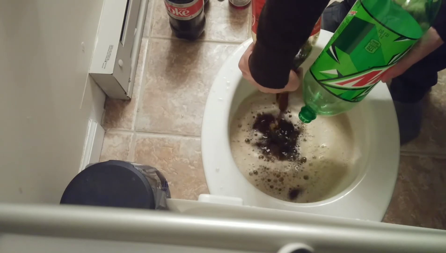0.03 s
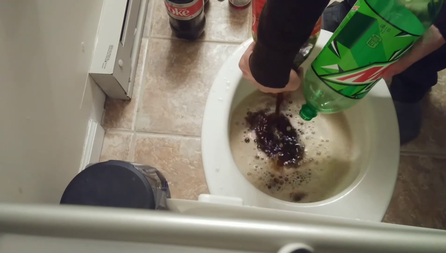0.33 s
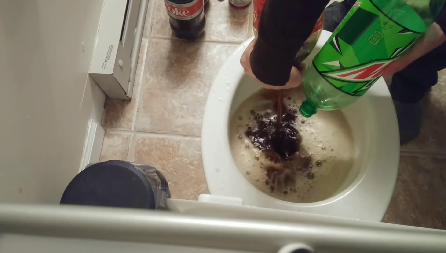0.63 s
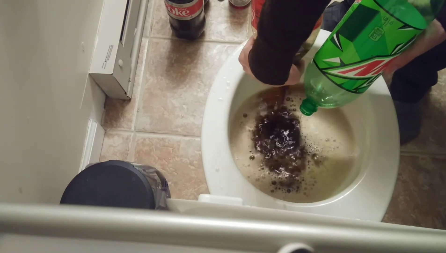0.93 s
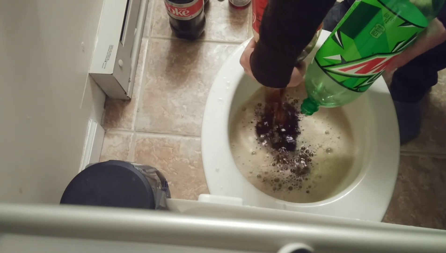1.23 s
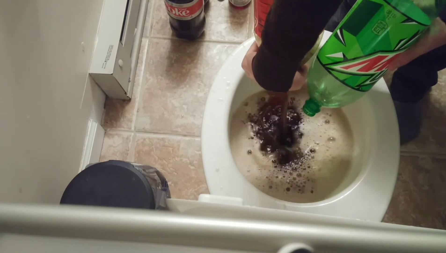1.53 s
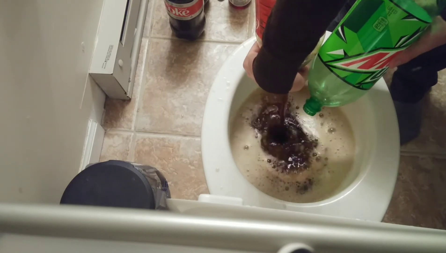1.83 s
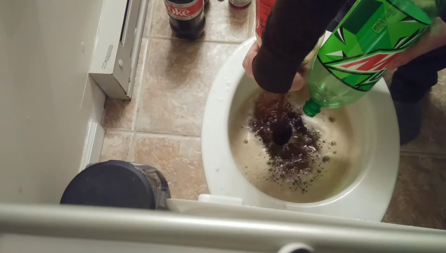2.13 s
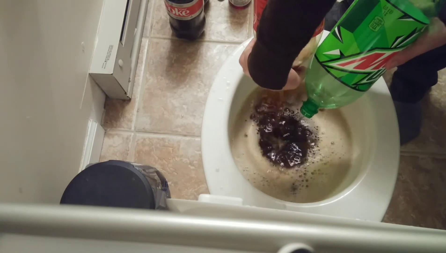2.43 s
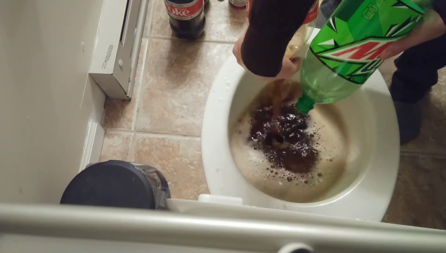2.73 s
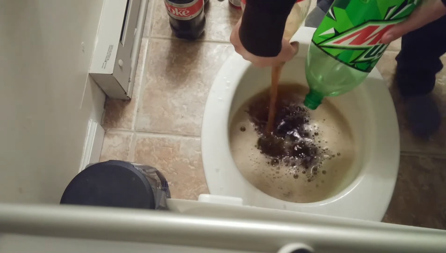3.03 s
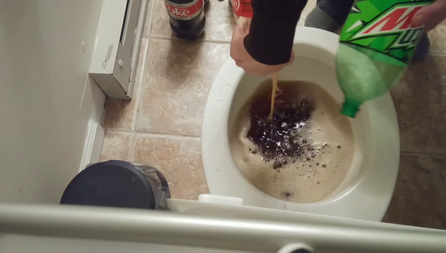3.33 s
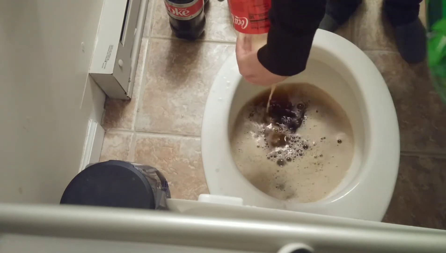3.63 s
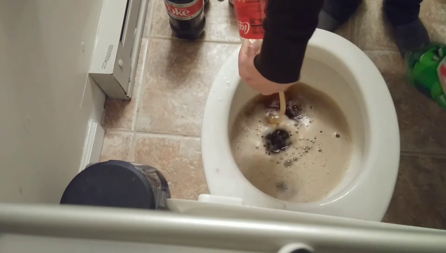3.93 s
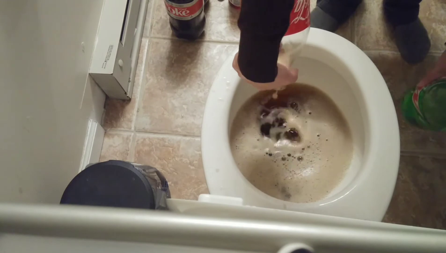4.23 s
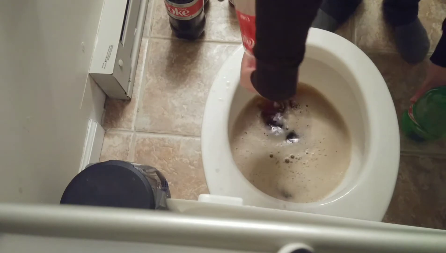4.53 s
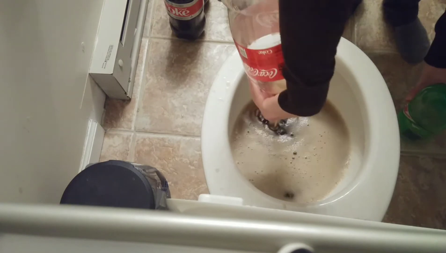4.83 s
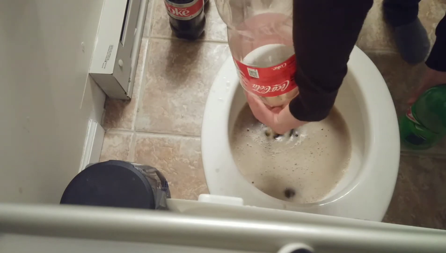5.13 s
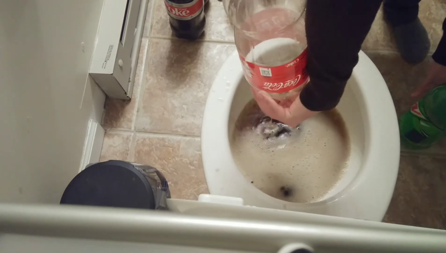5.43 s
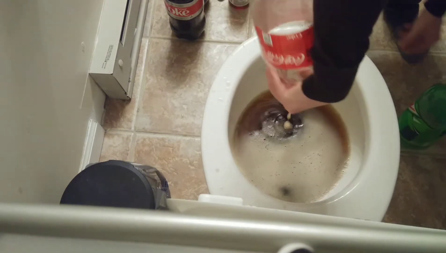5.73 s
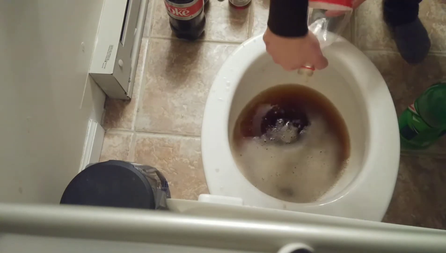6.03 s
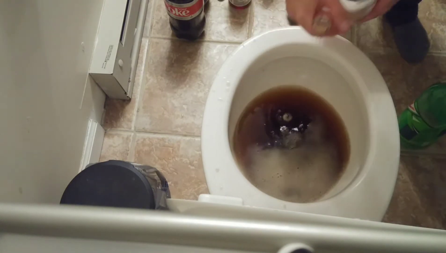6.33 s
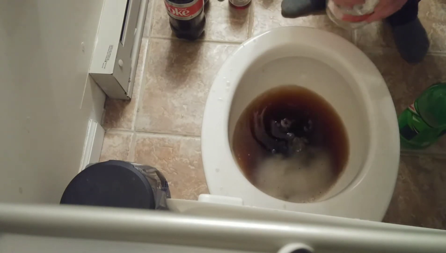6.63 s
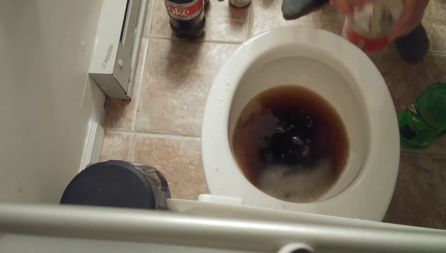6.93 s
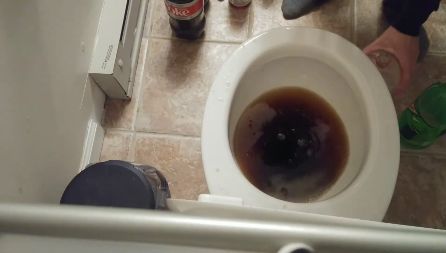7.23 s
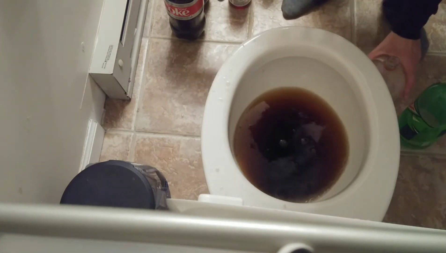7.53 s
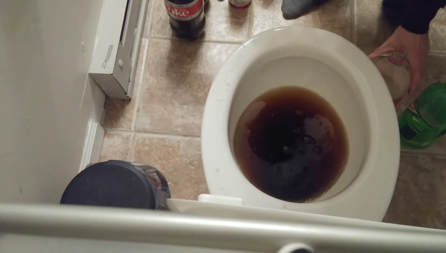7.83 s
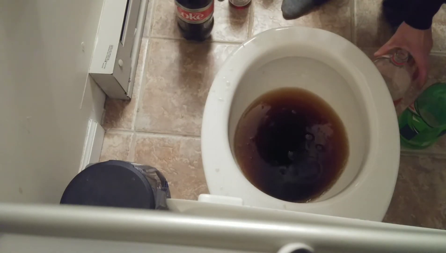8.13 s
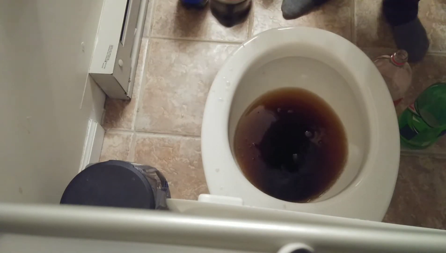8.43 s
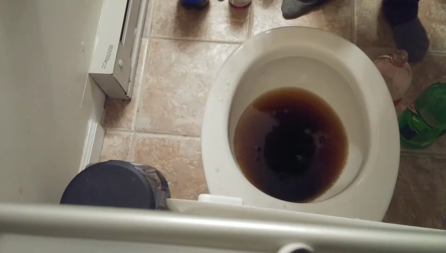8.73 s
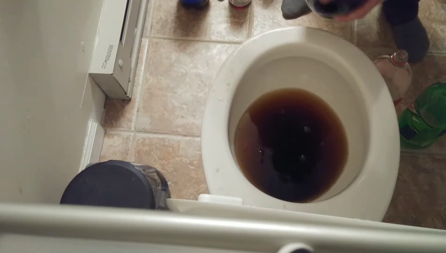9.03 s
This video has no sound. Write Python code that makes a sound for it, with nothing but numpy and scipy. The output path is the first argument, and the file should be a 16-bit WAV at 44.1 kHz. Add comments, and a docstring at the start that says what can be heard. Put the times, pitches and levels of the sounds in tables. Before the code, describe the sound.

Fizzy drink pours from big bottles into a toilet in rhythmic gulps, trickles off, and a hollow plastic bottle clatters down.

```python
"""Two big bottles of soda are emptied into a toilet bowl in a small tiled bathroom.
First the necks glug, about four gulps a second: soda slaps and sprays, trapped bubbles ring, foam fizzes.
By 3.5 s the streams thin to a trickle, and the last drops are shaken out over the hollow bowl.
At 7 s, as the foam collapses, an empty plastic bottle is knocked down and clatters on the floor.
Last, fingers rub and crinkle the thin plastic over a faint room tone."""
import sys
import numpy as np
from scipy import signal
from scipy.fft import rfft, irfft
from scipy.io import wavfile
from scipy.ndimage import uniform_filter1d

SR = 44100
rng = np.random.default_rng(int(sys.argv[2]) if len(sys.argv) > 2 else 0)


def wav_record(signal):
    """Record a signal, one row per channel, as 16-bit PCM in the file named by sys.argv[1]."""
    frames = np.transpose(np.atleast_2d(signal))
    bounded = np.clip(frames, -1, 1)
    # unit amplitude maps onto the largest positive 16-bit level
    quanta = np.round(bounded * 32767).astype(np.int16)
    wavfile.write(sys.argv[1], SR, quanta)


N = 405719
T = np.arange(SR // 2) / SR  # time within a one-shot, s

# gulps at the bottle necks: t/s, slap level/dB, slap centre f/Hz, gurgle level/dB, spray level/dB
GULPS = [(0.001, -27, 1100, -36, -41), (0.210, -37, 1890, -34, -39), (0.461, -29, 1274, -34.5, -73),
         (0.666, -35, 2010, -40, -37.5), (0.925, -47.5, 1420, -57, -40.5), (1.089, -40, 2030, -45, -72),
         (1.155, -39.5, 2100, -45.5, -45.5), (1.387, -36, 2170, -44, -48),
         (1.623, -33.5, 1820, -33.5, -30.5), (1.868, -39, 2090, -40, -42), (2.170, -35, 2270, -35.5, -45.5),
         (2.412, -29, 1950, -40, -38.5), (2.666, -50, 1650, -40.5, -42.5), (2.889, -46, 1610, -43, -36.5),
         (3.131, -38, 2230, -36.5, -36.5), (3.341, -33.5, 1076, -36.5, -44.5)]
# EQ of the wet slap: f/Hz, gain/dB
SLAP_EQ = [(50, 2), (110, 8), (170, -11), (300, -6), (700, 6.5), (1100, -13), (2200, 6), (3000, 4),
           (4300, 3), (8000, -32), (16000, -55)]


def glugs(room):
    """Each gulp of air slaps the liquid, traps mid-sized bubbles and leaves a gurgle of low ones."""
    out = np.zeros(N)
    for s, slap_db, hz, gurgle_db, _ in GULPS:
        splash = clicks(5000, 0.68, size=len(T)) * fade(0.033) * (1 - fade(0.01))
        slap = filt(eq(splash, SLAP_EQ), [hz / 1.93, hz * 1.09], "band", order=1)
        trapped = cluster(hz, spread=2.47, seconds=0.019, cycles=43, count=9)
        add(out, s, loudest(echo(unit(slap) + trapped, room), slap_db))
        gurgle = filt(cluster(330, spread=1.76, seconds=0.03, cycles=20.5, count=5), 280, "high")
        add(out, s, loudest(echo(gurgle, room), gurgle_db))
    return out


# the featured single bubbles: t/s, f/Hz, level/dB
BIG_BUBBLES = [(0.003, 276, -30), (0.372, 433, -42), (0.467, 272, -32.5), (0.553, 410, -40),
               (0.601, 3440, -36), (0.758, 1370, -39), (0.795, 430, -29.5), (0.833, 466, -37),
               (0.895, 2500, -37), (0.932, 372, -32.5), (1.177, 408, -39), (1.420, 422, -42.5),
               (1.622, 4390, -30.5), (1.688, 456, -34.5), (1.722, 654, -33.5), (1.775, 410, -37),
               (1.799, 847, -30.5), (1.965, 366, -39), (2.010, 720, -42), (2.075, 585, -42),
               (2.252, 338, -36), (2.483, 414, -42.5), (2.527, 630, -38), (2.743, 383, -37.5),
               (2.868, 1600, -41.5), (2.9, 365, -36.5), (3.352, 610, -37.5), (3.402, 292, -35)]


def plops(room):
    """Air pockets dragged under ring at their own notes; smaller, higher ones last more cycles."""
    out = np.zeros(N)
    featured = [(s, hz, db, 19.6 * (hz / 404) ** 0.43) for s, hz, db in BIG_BUBBLES]
    bloops = strays(low_hz=324, high_hz=728, boost_db=10.5, cycles=33, count=2)
    pings = strays(low_hz=1503, high_hz=5330, boost_db=9.3, cycles=52, count=4)
    for s, hz, db, cycles in featured + bloops + pings:
        ring = np.zeros(len(T))
        add(ring, 0, bubble(hz, cycles, glide=0.053, swell=1.66))
        add(out, s, loudest(echo(ring, room), db))
    return out


def strays(low_hz, high_hz, boost_db, cycles, count):
    """Cues for chance bubbles behind each gulp: t/s, f/Hz, level/dB, cycles."""
    return [(s, low_hz * (high_hz / low_hz) ** rng.random(), db + boost_db, cycles)
            for s, db in wake(count)]


def wake(count, first_s=0.027, last_s=0.15, scatter_db=3):
    """Random cues just after each gulp, louder while the streams run harder: t/s, level/dB."""
    cues = []
    for s, *_ in GULPS:
        for late, size in rng.random((count, 2)):
            born = s + first_s + late * (last_s - first_s)
            flow_db = np.interp(born, *np.transpose(FLOW))
            cues.append((born, flow_db + scatter_db * (2 * size - 1)))
    return cues


# splashes between the gulps: t/s, patter level/dB, tick level/dB
SPLASHES = [(0.2618, -41, -63), (0.489, -41.5, -52), (0.601, -42, -62), (0.6893, -33, -62),
            (0.7132, -43.5, -49), (0.7876, -35.5, -47), (1.0307, -58, -44), (1.197, -42.5, -68),
            (1.2954, -43, -42.5), (1.3463, -36.5, -68), (1.364, -44, -43), (2.0604, -40, -68),
            (2.3118, -44, -57), (2.494, -39.5, -69), (2.5284, -44, -70), (2.7916, -38, -54),
            (3.0382, -40.5, -46)]
# EQ of drops hitting water: f/Hz, gain/dB
SPRAY_EQ = [(200, -27), (700, -17), (2000, -13), (3700, 2.5), (5000, -8), (7300, -5.5), (8600, -24),
            (16000, -24.5)]


def spray(room):
    """Spray lands with and between the gulps: a short patter, tiny trapped bubbles, a crisp tick on top."""
    out = np.zeros(N)
    with_gulps = [(s, db, db - 13.5) for s, *_, db in GULPS]
    for s, db, tick_db in with_gulps + list(SPLASHES):
        drops = clicks(3500, 2.6, size=len(T)) * fade(0.021)
        patter = unit(eq(drops, SPRAY_EQ))
        sparkle = undb(1) * cluster(3480, spread=1.31, seconds=0.012, cycles=36, count=5)
        add(out, s, loudest(echo(patter + sparkle, room), db))
        tick = filt(drops * fade(0.006), 8500, "high")
        add(out, s, loudest(echo(tick, room), tick_db))
    return out


def droplets(room, boost_db=8.5):
    """Fine drops thrown up by each gulp fall back with short wet ticks."""
    out = np.zeros(N)
    for s, db in wake(count=2):
        tick = eq(rng.standard_normal(len(T)) * fade(0.03), SPRAY_EQ)
        add(out, s, loudest(echo(tick, room), db + boost_db))
    return out


# the streams run hard, thin to a trickle and stop: t/s, dry churn level between surges/dB
FLOW = [(0, -62.5), (0.55, -56), (1.1, -58.5), (1.75, -57), (2.5, -54.5), (2.8, -59), (3.5, -72.5),
        (5.7, -65.5), (6.5, -72.5), (7.4, -81)]


def churn(room, count=4200):
    """The streams whip up a bed of small bubbles and flying drops."""
    crowd = np.zeros(N)
    for when, pitch, length, strength in rng.random((count, 4)):
        hz = 340 * 13 ** (pitch ** 0.7)
        cycles = (11 + 30 * pitch) * (0.5 + length)
        gain = undb(-3.2 * np.log(strength + 0.025) - 1.5 * pitch)  # a few poke out of the bed
        add(crowd, when * N / SR, gain * bubble(hz, cycles, glide=0.12, swell=0.5))
    drops = eq(clicks(440, 3.2, size=N), SPRAY_EQ)
    bed = unit(crowd) + unit(drops) * undb(-14)
    return echo(bed * curve(FLOW) * surge(), room)


def surge(swell_db=3, attack_s=0.044, hold_s=0.055, release_s=0.2, choke_db=0.5, choke_s=0.076):
    """The churn ducks as the neck chokes before each gulp, then swells while the slug of soda lands."""
    t = np.arange(N) / SR

    def at_gulps(corners):
        return np.max([np.interp(t - s, corners, [0, 1, 1, 0]) for s, *_ in GULPS], axis=0)

    swell = at_gulps(np.cumsum([0, attack_s, hold_s, release_s]))
    choke = at_gulps([-2 * choke_s, -choke_s, 0, attack_s])
    return undb(swell_db * swell - choke_db * choke)


# the empty bottle hits the floor: t/s, level/dB, contact cut-off f/Hz, thud level/dB
FLOOR_HITS = [(7.0761, -12, 19000, -44), (7.331, -30.5, 1280, -34), (7.58, -63, 1400, -64),
              (7.727, -49.5, 1690, -50), (7.745, -46, 990, -61), (7.785, -71, 978, -72.5),
              (7.852, -61, 1206, -63)]
# modes of its thin wall: f/Hz, relative level/dB, t60/s
WALL_MODES = [(430, -10.5, 0.14), (724.8, 1.5, 0.1), (733, 3.5, 0.21), (1001, -3, 0.11), (1496, -3, .16),
              (1872, 5, 0.21), (2378, -2.5, 0.14), (2775, 5, 0.2), (2860, 1.5, 0.18), (3080, 1.5, 0.26),
              (3120, -2.5, 0.22), (3340, 0, 0.21), (3621, 0.5, 0.2), (3790, 0.5, 0.22), (3903, 1, 0.2),
              (4062, 0.5, 0.19)]
# EQ of the crack: f/Hz, gain/dB
CRACK_EQ = [(40, -43), (100, -19), (150, -21.5), (420, -7), (600, -13), (720, -4), (1100, -9), (1350, -7),
            (2200, -7), (3100, -3), (4100, -3.5), (4900, -16), (7400, -17), (8700, -34.5), (11500, -28),
            (15500, -35)]


def knocks():
    """The bottle cracks and thuds on the tiles; its wall rings briefly under the room's reflections."""
    out = np.zeros(N)
    for s, db, contact_hz, thud_db in FLOOR_HITS:
        wall = sum(undb(mode_db) * np.sin(2 * np.pi * (hz * T + rng.random())) * fade(t60)
                   for hz, mode_db, t60 in WALL_MODES)
        crack = filt(eq(tiles(wet_db=12.5), CRACK_EQ), 15000, "low", order=1)
        tick = filt(rng.standard_normal(len(T)) * fade(0.013), [2700, 4600], "band", order=1)
        hit = loudest(crack, 0) + loudest(tick, -5) + loudest(wall * (1 - fade(0.005)), -4.5)
        # a softer contact keeps little but the lows
        softened = filt(hit, contact_hz, "low", order=4) + undb(-25.5) * hit
        add(out, s, loudest(softened, db))
        thud = filt(tiles(wet_db=8.5), [220, 430], "band")
        add(out, s, loudest(thud, thud_db))
    return out


# shakes and taps over the bowl: t/s, slap level/dB, ring level/dB, ring t60/s
BOTTLE_SHAKES = [(3.404, -37, -55, .1), (4.812, -39, -36.5, .1), (5.080, -54, -54, .16),
                 (5.338, -48, -44, .2), (5.529, -57, -51, .15), (5.587, -54, -49, .24),
                 (5.708, -54, -50.5, .2), (5.75, -54, -52, .17), (5.923, -68, -61, .19),
                 (6.049, -66, -59, .08), (6.444, -39.5, -38.5, .4)]
# EQ of the dull slosh: f/Hz, gain/dB
SLOSH_EQ = [(40, -53), (90, -5), (170, -8), (280, 1.5), (550, -8.5), (850, -12.5), (1300, -14.5),
            (2500, -21.5), (5000, -33), (16000, -60)]


def shakes(room):
    """Each shake slaps the last soda about and sets the bowl's lowest resonance ringing."""
    out = np.zeros(N)
    ring_hz = BOWL_MODES[0][0]
    for s, slap_db, ring_db, t60 in BOTTLE_SHAKES:
        slosh = clicks(4000, 3, size=len(T)) * fade(0.1) * (1 - fade(0.013))
        add(out, s, loudest(echo(eq(slosh, SLOSH_EQ), room), slap_db))
        ring = np.sin(2 * np.pi * ring_hz * T) * fade(t60) * (1 - fade(0.053))
        add(out, s, loudest(ring, ring_db))
    return out


# drips once the streams thin out: t/s, f/Hz, level/dB
LAST_DRIPS = [(3.655, 685, -49), (3.690, 666, -55), (3.853, 510, -57.5), (4.249, 1110, -70),
              (4.62, 860, -59), (5.176, 950, -61), (6.634, 980, -57), (6.808, 860, -54.5)]


def drips(room):
    """A drip is a soft splat of a few bubbles around one pitch."""
    out = np.zeros(N)
    for s, hz, db in LAST_DRIPS:
        splat = cluster(hz, spread=1.6, seconds=0.014, cycles=19, count=4)
        add(out, s, loudest(echo(splat, room), db))
    return out


# plastic crackles and squeaks, plus one short ring of the bowl at the last shake:
# t/s, level/dB, centre f/Hz, width/octaves
CRINKLES_AND_RING = [(6.444, -34, 4080, .33), (6.445, -37.5, 885, 0.12), (6.625, -47.5, 3980, 0.6),
                     (7.605, -47, 2693, 0.081), (7.607, -46, 3750, 0.44), (7.623, -50.5, 1170, 0.85),
                     (7.936, -64, 1704, 1.1), (8.041, -59, 480, 1.4), (8.429, -62, 1160, 0.17),
                     (8.551, -68, 1905, 0.83), (8.744, -59.5, 4220, 1), (8.821, -61.5, 340, 0.076),
                     (8.944, -63.5, 1650, 0.12)]


def crinkles_and_ring(room):
    """Thin plastic buckles under the fingers in small snaps; one narrow burst is the bowl ringing."""
    out = np.zeros(N)
    for s, db, hz, octaves in CRINKLES_AND_RING:
        edge_ratio = 2 ** (octaves / 2)
        burst = clicks(2500, 3.5, size=len(T)) * fade(0.04)
        tuned = filt(burst, [hz / edge_ratio, hz * edge_ratio], "band", order=1)
        add(out, s, loudest(echo(filt(tuned, 4900, "low"), room), db))
    return out


# jolts that set a bottle humming: t/s, level/dB
JOLTS = [(0.465, -55.5), (6.444, -54), (7.078, -43), (7.33, -49)]


def hums(hz=97.5):
    """The air in a two-litre bottle swings through its neck: one low note with a long, faint tail."""
    out, t = np.zeros(N), np.arange(2 * SR) / SR
    decay = fade(0.48, t) + 0.07 * fade(2.8, t)
    air = np.sin(2 * np.pi * hz * t) * decay * (1 - fade(0.025, t))
    for s, db in JOLTS:
        add(out, s, loudest(air, db))
    return out


# the foam flares, holds and collapses: t/s, level/dB
FOAM_LEVEL = [(0.0, -41), (0.1, -53.5), (1.36, -52.5), (2.02, -55.5), (2.84, -50.5), (3.3, -54.5),
              (3.69, -56), (6.38, -54), (8.07, -74.5), (9.2, -78.5)]
# EQ of the fizz: f/Hz, gain/dB
FIZZ_EQ = [(120, -66), (200, -31.5), (273, -12), (345, -18), (414, -24), (454, -21.5), (544, -3.5),
           (653, -14), (957, -4), (1210, -10.5), (3750, 2), (4920, -7), (7220, -9), (8500, -20),
           (15500, -18.5)]


def fizz(room):
    """Thousands of tiny gas bubbles burst in the foam, in small flurries."""
    flurry = curve([(s, 0.9 * rng.standard_normal()) for s in np.arange(0, N / SR, 0.04)])
    bursts = eq(clicks(9000, 2.4, size=N) * flurry, FIZZ_EQ)
    return unit(echo(bursts, room)) * curve(FOAM_LEVEL)


# hands let go of one bottle and pick up the next: t/s, level/dB
RUB_LEVEL = [(7.75, -86.5), (7.91, -65), (8.05, -73.5), (8.2, -80.5), (8.38, -80), (8.5, -73), (8.75, -74),
             (9.2, -82.5)]


def rubbing(room):
    """Fingers slide over the plastic in a dense run of soft slips."""
    slips = filt(clicks(260, 3, size=N), [386, 2400], "band")
    return unit(echo(slips, room)) * curve(RUB_LEVEL)


# air resonances of the bowl: f/Hz, peak gain/dB, t60/s
BOWL_MODES = [(276, -17.5, 0.14), (458, 3.5, 0.45), (640, -3, 0.054), (719.6, 1, 0.31), (885, 2, 0.046),
              (1383, 9.5, 0.15), (1387, 3, 0.36), (1650, -7.5, 0.22), (2110, -3, 0.027), (2697, 1.5, 0.043),
              (3560, 1.5, 0.04)]


def bowl(room):
    """The bowl adds its hollow resonances to the room's impulse response."""
    ring = sum(undb(db) * np.cos(2 * np.pi * hz * T) * 2 * fade(t60) / fade(t60).sum()
               for hz, db, t60 in BOWL_MODES)
    return room + ring


def tiles(wet_db, low_t60_s=0.24, treble_t60_s=0.065):
    """Impulse response of the bathroom: the direct sound, then dense reflections whose treble dies first."""
    noise = rng.standard_normal(len(T))
    low = filt(noise, 4900, "low", order=1)
    onset = np.minimum(T / 0.0031, 1)
    tail = (low * fade(low_t60_s) + (noise - low) * fade(treble_t60_s)) * onset
    return (T == 0) + undb(wet_db) * tail / np.linalg.norm(tail)


# EQ of the room tone: f/Hz, gain/dB
ROOM_EQ = [(24, -50), (40, -17.5), (154, -11), (333, 4), (472, -8), (548, -5), (973, -7), (1380, -14),
           (3560, -20.5), (8730, -24), (15500, -19.5)]


def room_tone(db=-72.5):
    """A faint, steady hush under everything."""
    return unit(eq(rng.standard_normal(N), ROOM_EQ)) * undb(db)


def bubble(hz, cycles, glide, swell):
    """A bubble rings for some cycles, swelling over the first ones and rising as it nears the surface."""
    age = np.linspace(0, 1, int(SR * cycles / hz) + 2)
    turns = cycles * age
    attack = 1 - np.exp(-(turns / swell) ** 2)
    return np.sin(2 * np.pi * turns * (1 + glide * age / 2)) * fade(1, age) * attack


def cluster(hz, spread, seconds, cycles, count):
    """A handful of bubbles around one pitch, born within a moment, the later ones weaker."""
    out = np.zeros(len(T))
    for late, pitch in rng.random((count, 2)):
        ring = bubble(hz * spread ** (pitch - 0.5), cycles, glide=0.164, swell=0.27)
        add(out, seconds * late, undb(-12 * late) * ring)
    return unit(out)


def clicks(per_s, spread_db, size):
    """Random clicks of either sign, a few louder than the rest."""
    hit = rng.random(size) < per_s / SR
    return hit * rng.choice([-1, 1], size) * undb(spread_db * np.minimum(rng.exponential(size=size), 6))


def undb(db):
    """Decibels to gain."""
    return 10 ** (np.asarray(db) / 20)


def curve(rows):
    """Fader ride through rows of t/s, level/dB."""
    return undb(np.interp(np.arange(N) / SR, *np.transpose(rows)))


def unit(x):
    """Scale to rms 1."""
    return x / np.std(x)


def loudest(x, db):
    """Scale so that the loudest 10 ms have this level."""
    return x * undb(db) / np.sqrt(uniform_filter1d(x * x, size=441).max() + 1e-18)


def fade(t60, t=T):
    """Exponential decay, 60 dB down at t60."""
    return np.exp(-np.log(1000) * t / t60)


def add(out, s, x):
    """Mix x into out at time s."""
    i = min(max(int(s * SR), 0), len(out))
    out[i:i + len(x)] += x[:len(out) - i]


def filt(x, hz, kind, order=2):
    """Butterworth filter."""
    return signal.sosfilt(signal.butter(order, hz, kind, fs=SR, output="sos"), x)


def eq(x, points, size=2048):
    """Minimum-phase EQ through points of f/Hz, gain/dB."""
    hz, db = np.transpose(points)
    bin_hz = np.fft.rfftfreq(size, 1 / SR)
    gain = undb(np.interp(np.log(bin_hz + 1), np.log(hz), db))
    cepstrum = irfft(np.log(gain))
    cepstrum[1:size // 2] *= 2  # folded forward, so nothing rings ahead of a transient
    cepstrum[size // 2 + 1:] = 0
    return echo(x, irfft(np.exp(rfft(cepstrum))))


def echo(x, response):
    """Play x through an impulse response."""
    return signal.fftconvolve(x, response)[:len(x)]


def scene():
    """Mono mix: the pour up close in the bowl, the floor beside it heard mostly by reflection."""
    in_bowl, in_room = bowl(tiles(wet_db=-4)), tiles(wet_db=-3.5)
    liquid = glugs(in_bowl) + plops(tiles(wet_db=-3.5)) + spray(in_bowl) + droplets(in_bowl)
    liquid += churn(in_bowl) + drips(in_bowl) + fizz(tiles(wet_db=-12.5))
    handling = shakes(in_bowl) + knocks() + hums() + crinkles_and_ring(in_room) + rubbing(in_room)
    return (liquid + handling + room_tone())[None]


def record(dry, low_cut_hz=45, high_cut_hz=15900):
    """Master chain: thin the deep bass, soft-clip the peaks, cut the top steeply."""
    rounded = np.tanh(filt(dry, low_cut_hz, "high"))
    return signal.sosfilt(signal.ellip(10, 0.2, 70, high_cut_hz, fs=SR, output="sos"), rounded)


dry = scene()
out = record(dry)
wav_record(out)
```